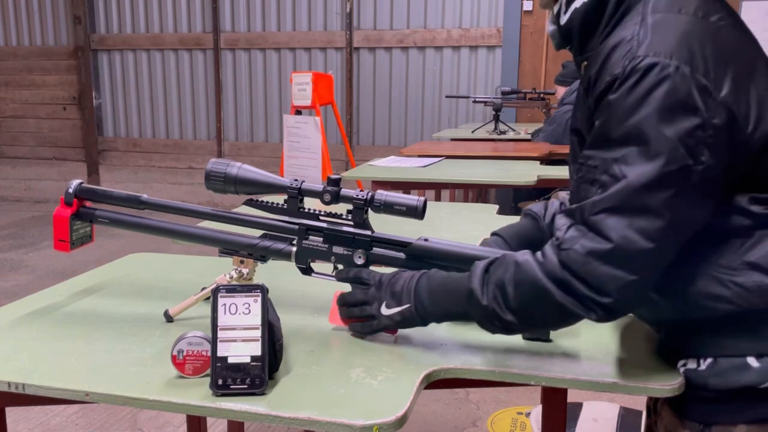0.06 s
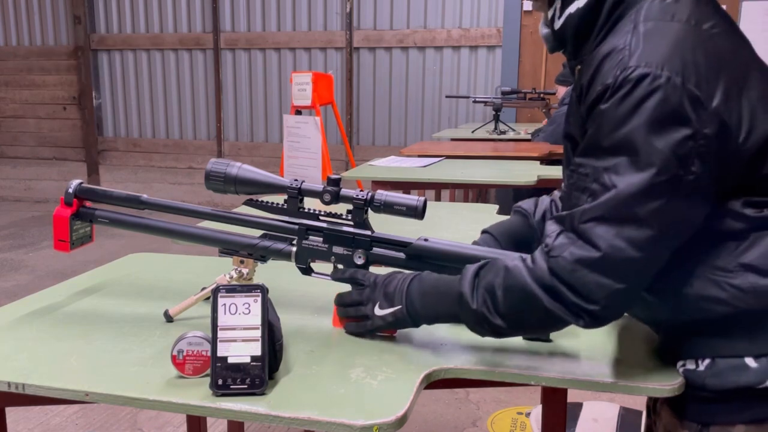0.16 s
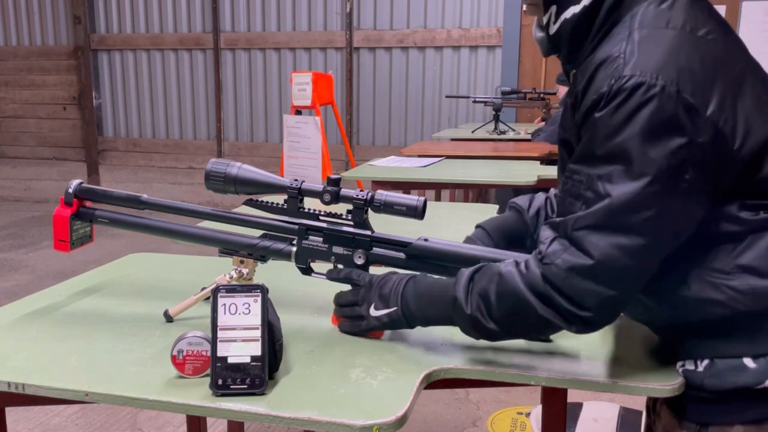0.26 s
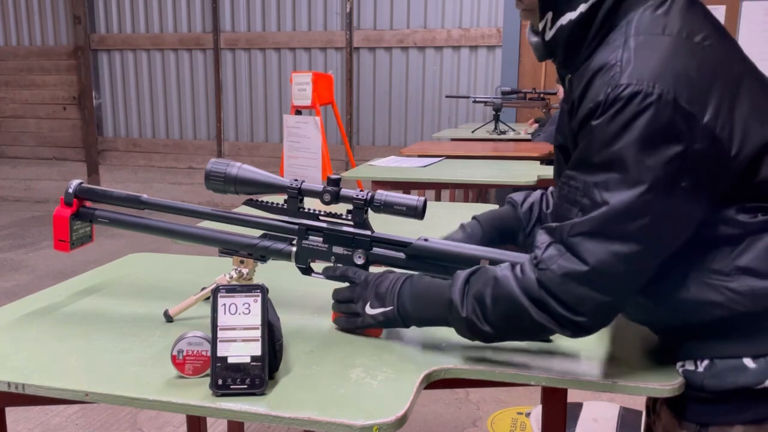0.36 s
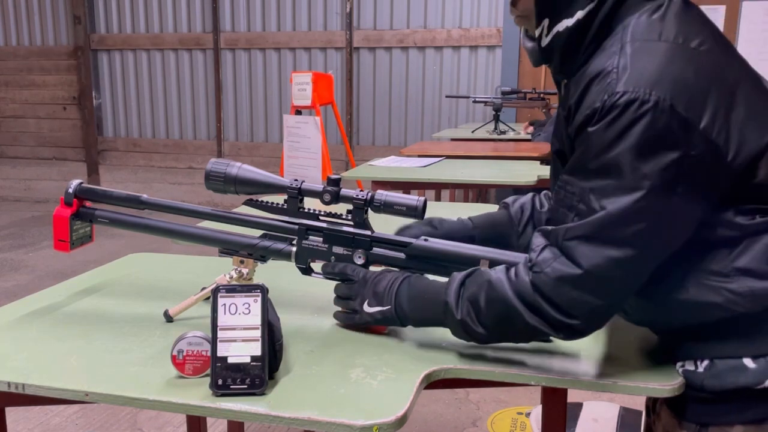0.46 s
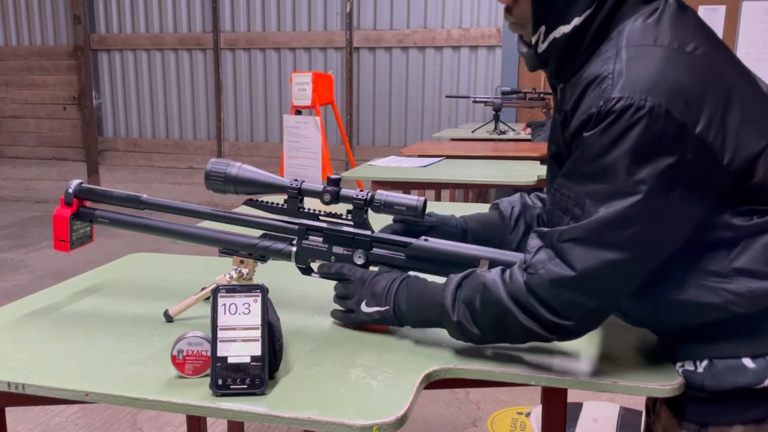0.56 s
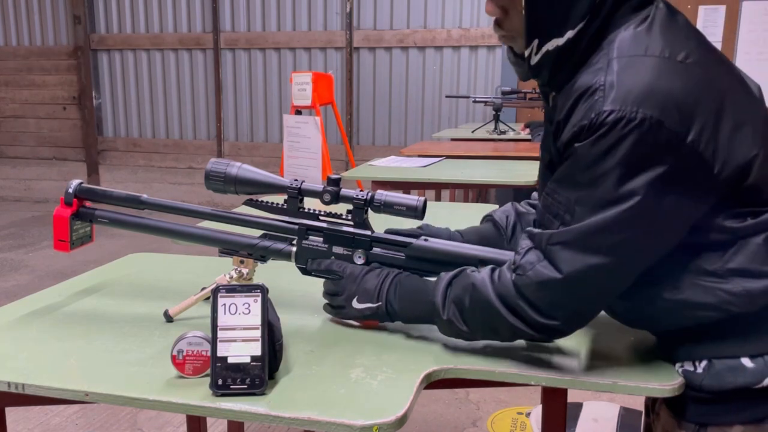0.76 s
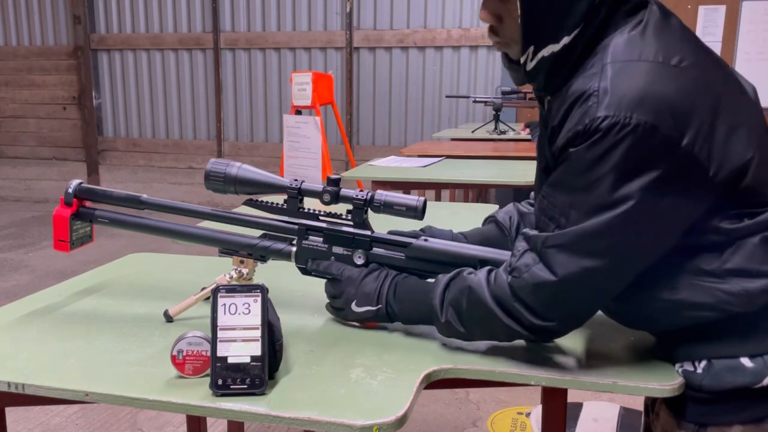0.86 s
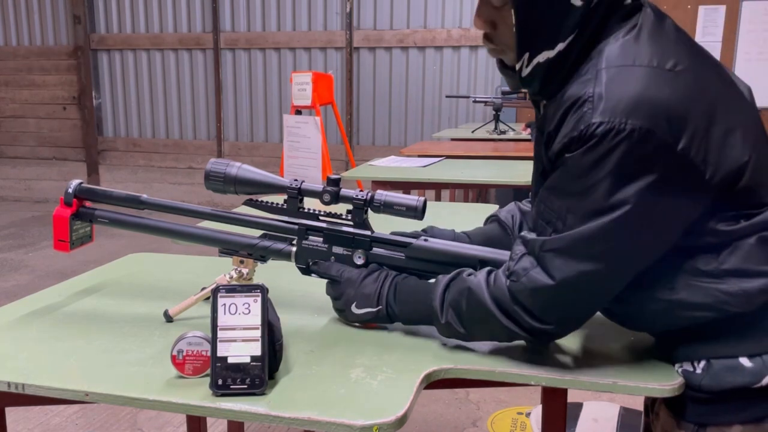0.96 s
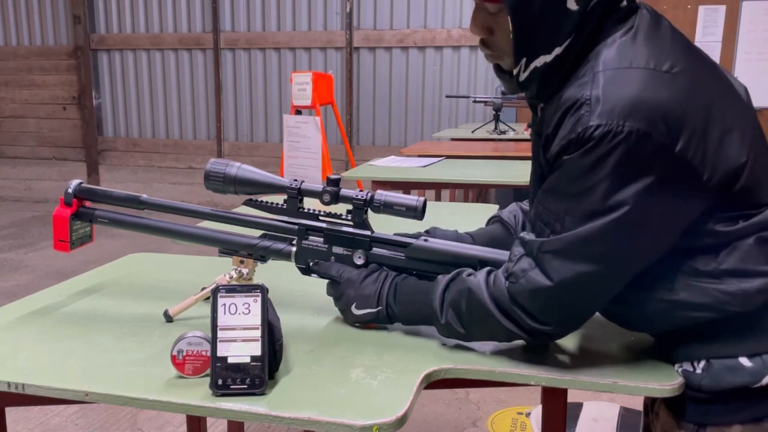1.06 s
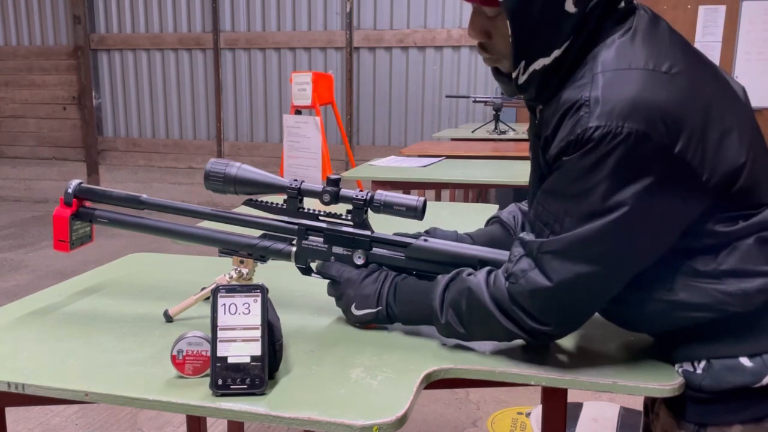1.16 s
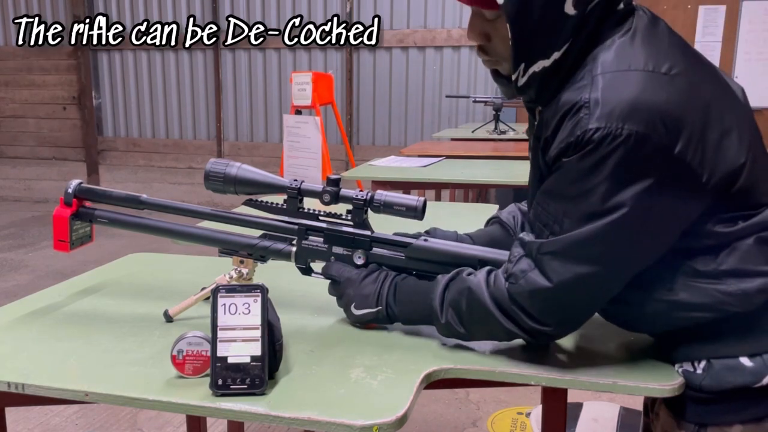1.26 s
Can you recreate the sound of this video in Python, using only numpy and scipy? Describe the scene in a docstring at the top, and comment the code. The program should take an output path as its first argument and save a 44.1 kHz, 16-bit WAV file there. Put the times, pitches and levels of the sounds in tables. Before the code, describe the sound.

An air rifle fires one sharp crack that rings through a metal shed, then handling clicks

```python
"""In a shed-like indoor range with sheet-metal walls, an air rifle fires once.
The muzzle gives a sharp crack (short decaying tones) and a puff of air (a short burst of noise).
Bench and floor throw it back with delayed copies and a low boom; fading noise and faint tones ring on.
Afterwards a rifle is handled close by: small clicks (ticks, knocks and pings) and rubbing noise,
with the swish of a jacket sleeve. A low room rumble of steady noise lies under everything."""
import sys
import numpy as np
from scipy import signal
from scipy.fft import rfft, irfft
from scipy.io import wavfile
from scipy.ndimage import uniform_filter1d

SR = 44100
rng = np.random.default_rng(int(sys.argv[2]) if len(sys.argv) > 2 else 0)


def wav_out(sig):
    """Save sig, one row per channel (or a flat mono array), as 16-bit PCM at SR to the path in sys.argv[1]."""
    wavfile.write(sys.argv[1], SR, np.round(np.clip(np.atleast_2d(sig).T, -1, 1) * 32767).astype(np.int16))


N = 57330
T = np.arange(N) / SR  # time of each sample in seconds
SHOT_S = 0.20165


def from_db(db):
    """Turn decibels into a gain."""
    return 10 ** (np.asarray(db) / 20)


def at_hz(points, hz):
    """Read a table between its points, on a log-frequency axis."""
    table_hz, values = np.transpose(points)
    return np.interp(np.log(np.maximum(hz, 1)), np.log(table_hz), values)


def pan(left_minus_right_db):
    """Left and right gains that differ by the given decibels."""
    return from_db(np.array([[.5], [-.5]]) * left_minus_right_db)


# how alike left and right are, for sound from all around and for sound straight from its source;
# 1 is the same, -1 is opposite, values beyond are clipped: pitch_hz, likeness
DIFFUSE = [(60, 1.05), (200, 1.8), (400, 0.22), (800, -0.12), (1300, 0), (2400, .3), (4400, 0.21),
           (7000, 0.13), (8200, -1.21), (9400, -1.55), (10300, 0), (12000, 0.8)]
DIRECT = [(100, 0.81), (3000, 1), (5000, -0.036), (8500, -0.86), (10500, -0.59), (12000, 0.0041)]
# how much louder the left is than the right: pitch_hz, left_minus_right_db
BALANCE = [(60, 3.1), (300, 2.5), (1200, 1.2), (2200, 1.7), (4200, 4), (8000, 1), (13000, -1)]


def noise(spectrum, likeness):
    """Stereo noise with a given tone colour, scaled to rms 1."""
    hz = np.fft.rfftfreq(N, 1 / SR)
    mid, side = rfft(rng.standard_normal((2, N)))
    alike = np.clip(at_hz(likeness, hz), -.99, .99)
    # the middle part is shared; the side part has opposite signs left and right
    both = np.sqrt(1 + alike) * mid + np.sqrt(1 - alike) * side * np.array([[1], [-1]])
    colour = from_db(at_hz(spectrum, hz)) * pan(at_hz(BALANCE, hz))
    x = irfft(both * colour, N)
    return x / x.std()


def decay(start_s, t60_s):
    """Envelope that jumps to 1 at the start, then falls by 60 dB in every t60_s."""
    return (T >= start_s) * np.exp(-np.log(1000) * np.maximum(T - start_s, 0) / t60_s)


def ring(start_s, pitch_hz, t60_s):
    """One struck resonance: a sine tone that dies away."""
    return decay(start_s, t60_s) * np.sin(2 * np.pi * pitch_hz * (T - start_s))


def build_up(start_s, build_s):
    """Gain that rises smoothly from 0 towards 1 after the start."""
    return 1 - np.exp(-np.maximum(T - start_s, 0) / build_s)


def swell(strokes):
    """Sum of smooth rises, each followed by an exponential fall."""
    total = 0
    for peak_s, level_db, rise_s, fall_s in strokes:
        from_peak = T - peak_s
        fade = np.where(from_peak < 0, (from_peak / rise_s) ** 2, from_peak / fall_s)
        total = total + from_db(level_db) * np.exp(-fade)
    return total


def flicker(depth_db, span_s):
    """Gain that wavers at random, from noise smoothed over a short span."""
    grain = uniform_filter1d(rng.standard_normal(N), size=max(2, int(span_s * SR)))
    return from_db(depth_db * grain / grain.std())


# tone colour of the room rumble: pitch_hz, level_db (per Hz, relative)
RUMBLE_COLOUR = [(15, -30), (30, -21.5), (45, -2.5), (60, 3), (78, -3.5), (105, -2.5), (170, -11),
                 (400, -14.5), (1100, -15), (2200, -23.5), (4500, -33), (9000, -39.5), (12000, -41.5),
                 (15000, -50)]
RUMBLE_DB = -57


def room_rumble():
    """Steady background noise, strongest in the bass."""
    return from_db(RUMBLE_DB) * noise(RUMBLE_COLOUR, DIFFUSE)


def friction(strokes, spectrum, likeness, grain_db):
    """Rubbing surfaces: noise that swells with each stroke, with an optional fine grain."""
    return swell(strokes) * noise(spectrum, likeness) * flicker(grain_db, span_s=.0014)


# the stock shifts on the bench: peak_s, level_db, rise_s, fall_s
SHIFTS = [(.70, -47.5, 0.09, 0.049), (.845, -48.5, 0.066, 0.12), (1.04, -57.5, 0.073, 0.39)]
# tone colour of the rubbing stock: pitch_hz, level_db (per Hz, relative)
RUB_COLOUR = [(60, -27), (150, -35), (600, 1.5), (1200, 7), (2400, 0), (5000, -18.5), (12000, -29)]


def stock_shifts():
    """The stock rubs on the bench: slow swells of smooth noise."""
    return friction(SHIFTS, RUB_COLOUR, DIFFUSE, grain_db=0.0)


# sleeve swishes: peak_s, level_db, rise_s, fall_s
SWISHES = [(.70, -51, .015, 0.07), (.84, -58, 0.024, .05), (1.24, -74, 0.026, 0.075)]
# tone colour of the cloth: pitch_hz, level_db (per Hz, relative)
CLOTH_COLOUR = [(200, -12), (500, -10), (1200, 1), (3000, -6), (6000, 4), (8500, 0.5), (11500, -0.5),
                (13200, -11.5), (15000, -24)]


def sleeve_swishes():
    """Cloth rubs on cloth: short swells of grainy noise."""
    return friction(SWISHES, CLOTH_COLOUR, DIRECT, grain_db=1.0)


# clicks of the action: start_s, tick_db, knock_db, ping_hz, ping_db, left_minus_right_db
CLICKS = [(0.4582, -42, -37.5, 1510, -18, 3), (0.6856, -56, -54, 11300, -47, 0),
          (0.7071, -55, -40.5, 1750, -34, -14), (1.0386, -54.5, -57, 4400, -47.5, -7),
          (1.1339, -64, -72, 10440, -69, -11.5), (1.1920, -52, -51, 1350, -36, 7),
          (1.1933, -45, -35.5, 5400, -54, -2)]
# tone colour of the tick: pitch_hz, level_db (per Hz, relative)
TICK_COLOUR = [(500, -14), (1500, 3), (4000, 4.5), (6500, 2), (9000, -5.5), (12500, 3), (15000, -6)]
# resonances in the knock of the action: pitch_hz, level_db (relative), t60_s
ACTION = [(449, -4.5, 0.014), (600, -15.5, .016), (1240, -18, 0.013), (1560, -9, 0.011), (2790, -17, 0.02)]
TICK_T60_S, PING_T60_S = 0.011, 0.0037
CLICK_ROOM_DB, CLICK_ROOM_T60_S = -31, 0.35  # room level is relative to the tick


def clicks():
    """Each contact is a bright tick, a ping of the small part and a knock of the action, with some room."""
    tick_noise = noise(TICK_COLOUR, DIRECT)
    room_noise = noise(TICK_COLOUR, DIFFUSE)
    out = 0
    for start_s, tick_db, knock_db, ping_hz, ping_db, left_minus_right_db in CLICKS:
        knock = 0
        for pitch_hz, level_db, t60_s in ACTION:
            sign = rng.choice([-1, 1])
            knock = knock + from_db(level_db) * sign * ring(start_s, pitch_hz, t60_s)
        tick = tick_noise * decay(start_s, TICK_T60_S)
        room = from_db(CLICK_ROOM_DB) * room_noise * decay(start_s, CLICK_ROOM_T60_S)
        ping = from_db(ping_db) * ring(start_s, ping_hz, PING_T60_S)
        click = from_db(tick_db) * (tick + room) + from_db(knock_db) * knock + ping
        out = out + pan(left_minus_right_db) * click
    return out


# sheet metal set ringing by the shot: pitch_hz, level_db (relative to METAL_DB), t60_s
METAL = [(334.3, -6, 1.14), (578, -7, 1.3), (1107, -0.5, .9), (1382, -3.5, 0.75), (1427, -7, 1.6),
         (1660, -5.5, 1.1), (1659, 4, .7), (1766, 3, .7), (1870, -3.5, 1), (2632, -3, 0.21),
         (2697, -2, 0.25), (4001, 6, .6), (5130, -2, 0.42)]
METAL_DB = -39.5


def sheet_metal():
    """Faint lasting tones of sheet metal, reaching each ear at its own moment."""
    delays_s = rng.uniform(.002, .008, (len(METAL), 2, 1))
    out = 0
    for (pitch_hz, level_db, t60_s), delay_s in zip(METAL, delays_s):
        out = out + from_db(METAL_DB + level_db) * ring(SHOT_S + delay_s, pitch_hz, t60_s)
    return out


# tone colour of the scatter from nearby benches, also used for the slap: pitch_hz, level_db (per Hz, relative)
EARLY_COLOUR = [(60, -25), (110, -2), (250, -26), (340, 3), (650, -1), (1200, 8), (2200, 1.5), (4500, 0),
                (7000, -5.5), (9500, -14), (13200, -9.5), (14600, -32.5)]
EARLY_DB, EARLY_T60_S, EARLY_DELAY_S = -23.5, 0.31, 0.0019
# the far wall throws back a smeared slap
SLAP_DB, SLAP_T60_S, SLAP_DELAY_S = -29, 0.24, 0.022
# tone colour of the hall's long tail: pitch_hz, level_db (per Hz, relative)
TAIL_COLOUR = [(50, -24), (110, -21), (200, -7.5), (280, -15.5), (500, -8.5), (750, -7), (1100, 1),
               (1650, 1.5), (3000, -2), (4200, -4), (6000, -6), (7500, -9), (9000, -7), (11000, -17.5),
               (13200, -21), (14500, -32)]
# how long the tail takes to fall by 60 dB: pitch_hz, t60_s
TAIL_T60 = [(100, 1.4), (400, 2.69), (1000, 2.26), (2000, 1.54), (4000, 1.333), (7000, .72), (12000, 0.54)]
TAIL_DB, TAIL_BUILD_S = -28, 0.015
HALL_GRAIN_DB, HALL_GRAIN_S = 1.02, 0.0022


def hall():
    """Early scatter, a far-wall slap and a tail whose treble dies first, all with a fine random flicker."""
    early_fade = decay(SHOT_S + EARLY_DELAY_S, EARLY_T60_S)
    early = from_db(EARLY_DB) * noise(EARLY_COLOUR, DIFFUSE) * early_fade
    slap_fade = decay(SHOT_S + SLAP_DELAY_S, SLAP_T60_S)
    slap = from_db(SLAP_DB) * noise(EARLY_COLOUR, DIFFUSE) * slap_fade

    # split the tail into overlapping bands so that each can fade at its own rate
    wash = rfft(noise(TAIL_COLOUR, DIFFUSE))
    hz = np.fft.rfftfreq(N, 1 / SR)
    centres_hz = np.geomspace(80, 15000, 16)
    tail = 0
    for centre_hz, peak in zip(centres_hz, np.eye(len(centres_hz))):
        weight = at_hz(np.c_[centres_hz, peak], hz)  # 1 at this centre, 0 at the others
        tail = tail + irfft(wash * weight, N) * decay(SHOT_S, at_hz(TAIL_T60, centre_hz))
    tail = from_db(TAIL_DB) * tail * build_up(SHOT_S, TAIL_BUILD_S)
    return (early + slap + tail) * flicker(HALL_GRAIN_DB, HALL_GRAIN_S)


# bench and shed answer the shot with a low boom: delay_s, pitch_hz, level_db, t60_s
BOOM = [(0.0251, 102, -41, 0.19), (.026, 150, -33.5, 0.13), (0.011, 222, -43.5, 0.5),
        (0.0017, 350, -28, 0.044), (0.00067, 860, -38.5, 0.022)]
BOOM_BUILD_S = 0.006


def boom():
    """Low resonances of bench and shed that build up just after the shot."""
    out = 0
    for delay_s, pitch_hz, level_db, t60_s in BOOM:
        start_s = SHOT_S + delay_s
        tone = ring(start_s, pitch_hz, t60_s) * build_up(start_s, BOOM_BUILD_S)
        out = out + from_db(level_db) * tone
    return out


# the crack rings very briefly in barrel and shroud: pitch_hz, level_db (before the paths), t60_s
CRACK = [(1280, -13.5, 0.0064), (1900, -10.5, 0.0061), (2450, -8.5, 0.004), (3900, -10.5, 0.0042),
         (6500, -19, .0035), (10600, -23.5, 0.0068), (12900, -14.5, 0.0053)]
# tone colour of the air leaving the muzzle: pitch_hz, level_db (per Hz, relative)
PUFF_COLOUR = [(100, -17), (350, -7.5), (700, 4), (1200, -3.5), (2200, 8), (4000, -3.5), (6000, -4.5),
               (9000, 1.5), (12800, -4), (15000, -17)]
PUFF_DB, PUFF_T60_S = -17, 0.021  # level before the low cut and the paths
MUZZLE_LOW_CUT_HZ = 700
# paths of the shot to the listener: delay_s, level_db, dulled_above_hz, left_minus_right_db
PATHS = [(0, 2, 18000, -1.5), (.0011, -36.5, 4970, -3.5), (.00385, 3.5, 3500, 2.5),
         (.0068, -19, 11860, 13.5)]


def shot():
    """Pressure crack and puff of air, arriving directly and off the nearest surfaces."""
    crack = 0
    for k, (pitch_hz, level_db, t60_s) in enumerate(CRACK):
        crack = crack + (-1) ** k * from_db(level_db) * ring(SHOT_S, pitch_hz, t60_s)
    puff = from_db(PUFF_DB) * noise(PUFF_COLOUR, DIRECT) * decay(SHOT_S, PUFF_T60_S)
    low_cut = signal.butter(2, MUZZLE_LOW_CUT_HZ, "high", fs=SR, output="sos")
    muzzle = signal.sosfilt(low_cut, crack + puff)
    out = 0
    for delay_s, level_db, dulled_above_hz, left_minus_right_db in PATHS:
        late = np.roll(muzzle, round(delay_s * SR), axis=1)
        dulling = signal.butter(2, min(dulled_above_hz, .45 * SR), fs=SR, output="sos")
        out = out + from_db(level_db) * pan(left_minus_right_db) * signal.sosfilt(dulling, late)
    return out


def scene():
    """Room rumble, handling of the rifle, and the shot with the answer of the hall."""
    handling = stock_shifts() + sleeve_swishes() + clicks()
    answer = sheet_metal() + hall() + boom()
    return room_rumble() + handling + answer + shot()


def record(dry):
    """Cut the top of the treble with a steep low-pass filter at 15000 Hz."""
    top_cut = signal.ellip(10, .2, 80, 15000, fs=SR, output="sos")  # ripple and stop depth in dB
    return signal.sosfilt(top_cut, dry)


dry = scene()
out = record(dry)
wav_out(out)
```